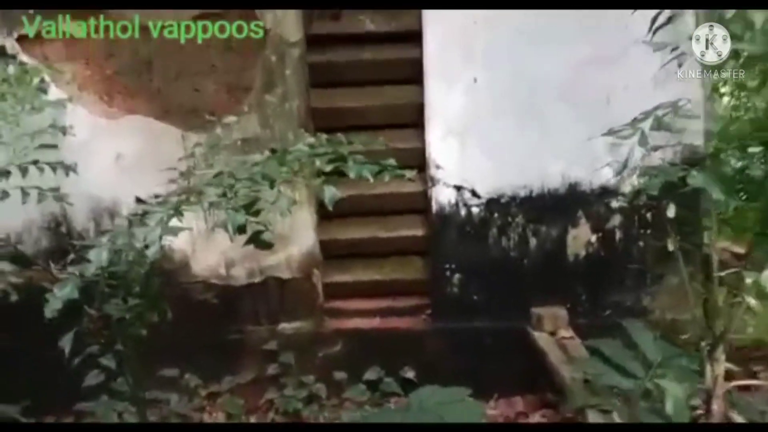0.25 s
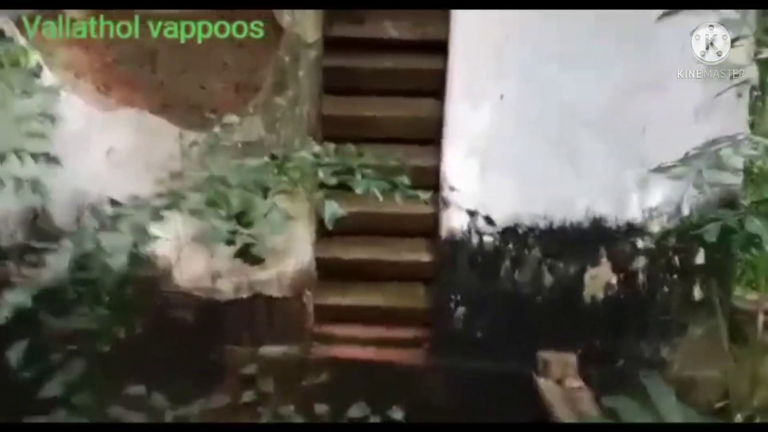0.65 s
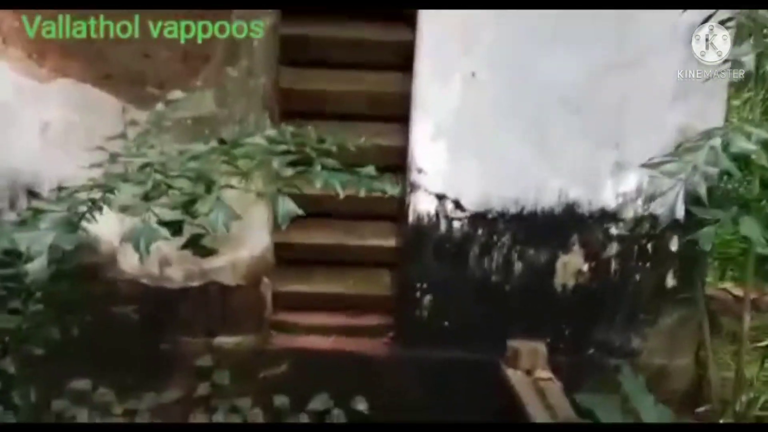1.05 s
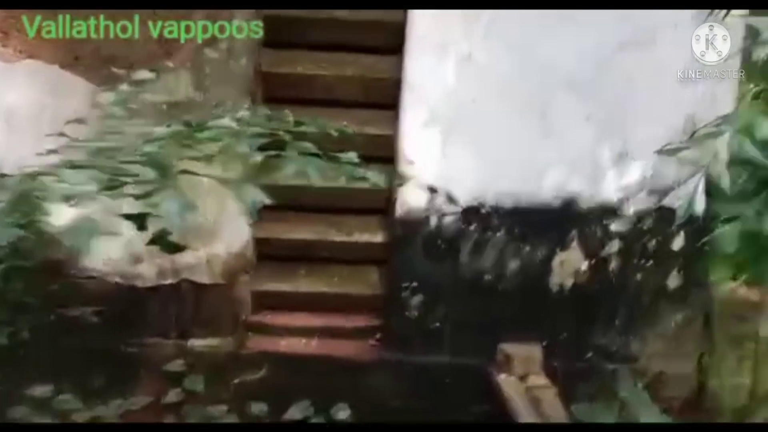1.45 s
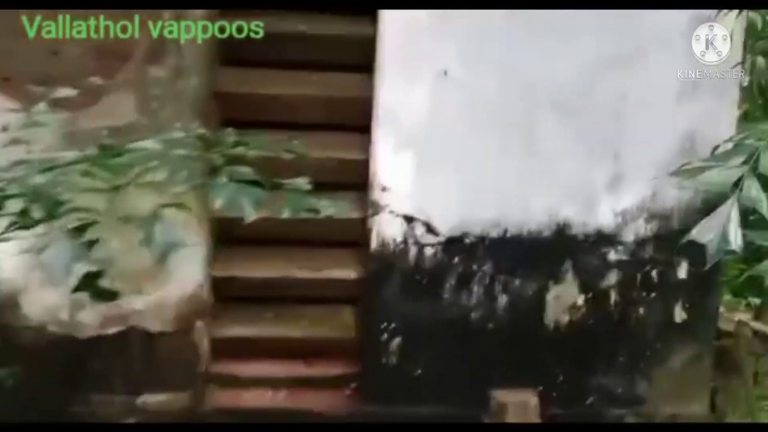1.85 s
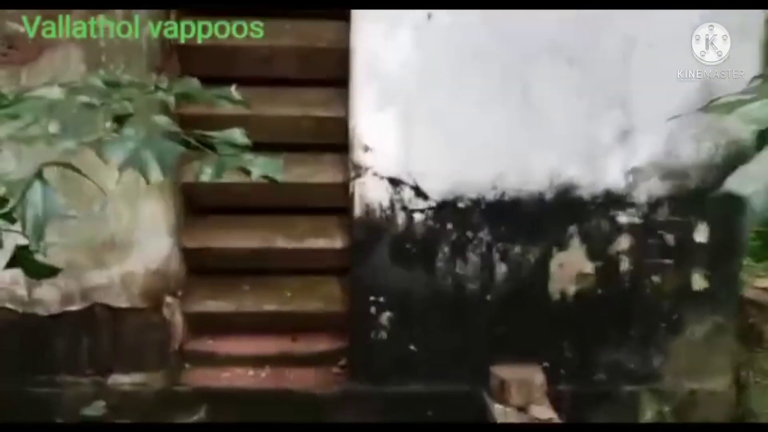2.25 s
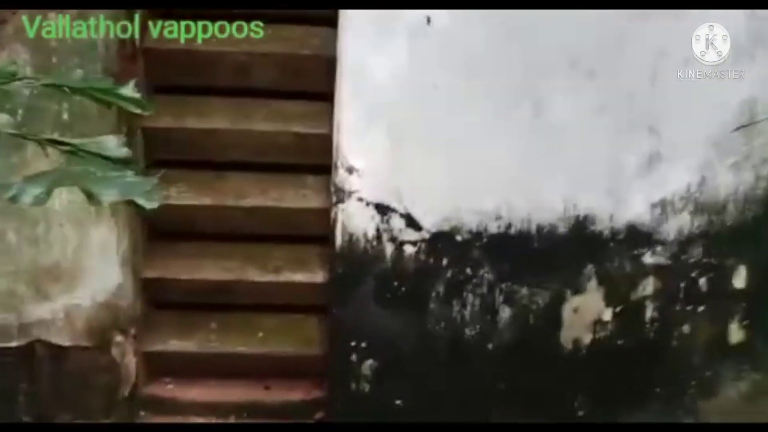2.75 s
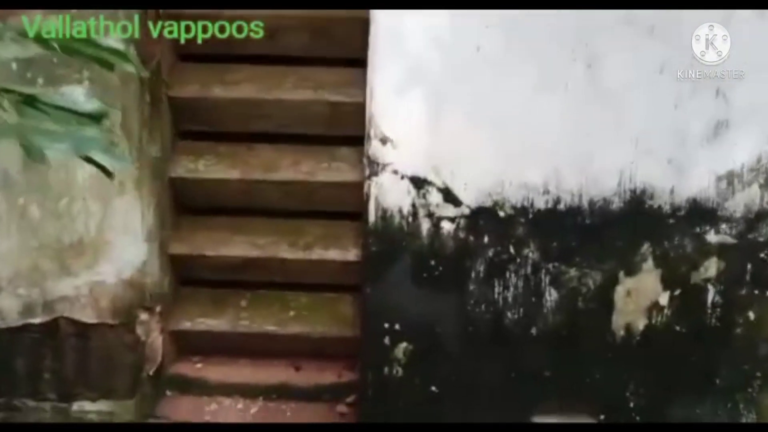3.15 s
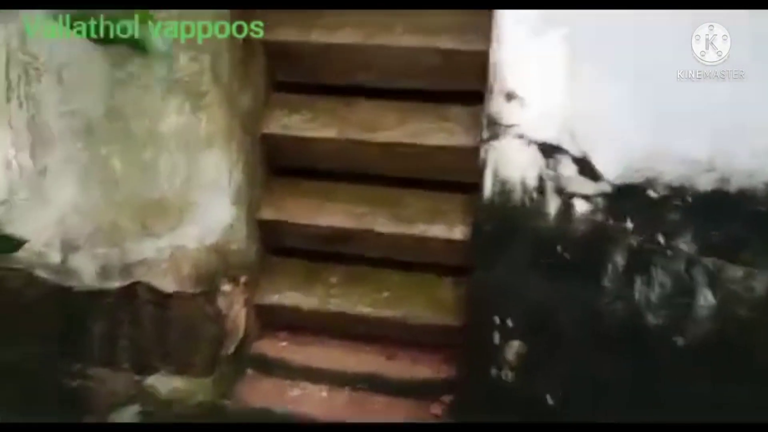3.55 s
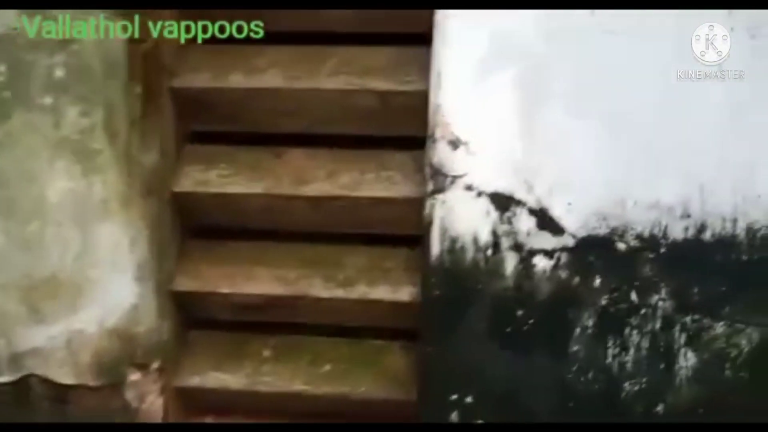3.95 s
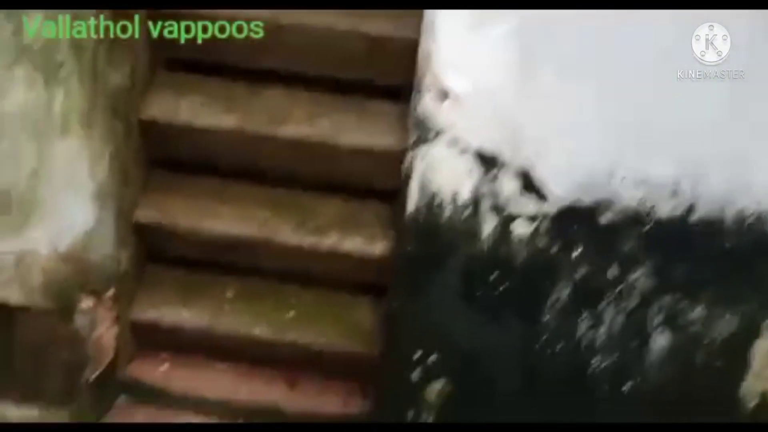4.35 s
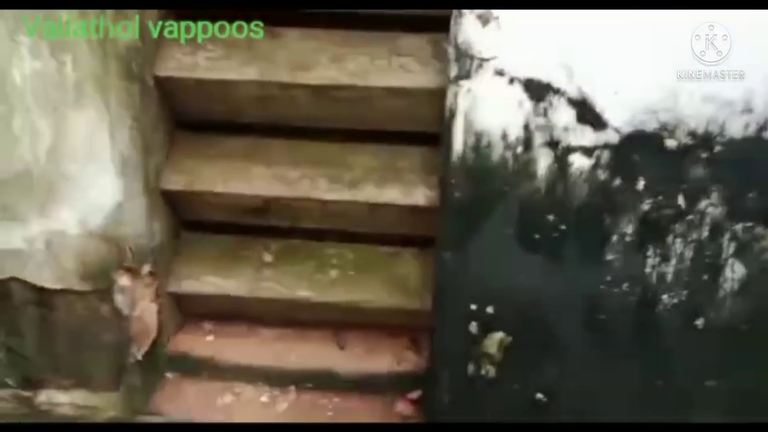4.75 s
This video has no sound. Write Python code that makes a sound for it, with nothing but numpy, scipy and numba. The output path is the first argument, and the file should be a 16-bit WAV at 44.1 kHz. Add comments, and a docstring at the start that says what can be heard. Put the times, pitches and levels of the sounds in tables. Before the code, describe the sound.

Close rustling through plants and leaf litter, swelling and fading, broken by crisp stem snaps, short twig cracks and a few hard crunches.

```python
"""Leaves swish and dry litter crunches as someone pushes through undergrowth beside an old wall, phone in hand.
Every move swells and fades noise full of tiny fractures, with a pocket of air ringing under the leaves.
Thin stems snap as bright noise bursts; thicker twigs give way in runs of short, pitched cracks.
Something hollow is rubbed close by, ringing in narrow noise bands, and soft bumps are low, damped swings.
Plants, ground, wall and stairs scatter these sounds over faint background noise with a raised treble band."""
import sys
import numpy as np
from scipy import signal
from scipy.fft import rfft, irfft
from scipy.io import wavfile
from scipy.ndimage import uniform_filter1d
from numba import njit

SR = 44100
rng = np.random.default_rng(int(sys.argv[2]) if len(sys.argv) > 2 else 0)


def dump(signal):
    """Clip the signal to [-1, 1] and save it as 16-bit WAV at the path in sys.argv[1]."""
    limited = np.clip(np.atleast_2d(signal).T, -1, 1)
    pcm = np.round(limited * 32767).astype(np.int16)
    wavfile.write(sys.argv[1], SR, pcm)


N = 220667
TIME = np.arange(N) / SR  # seconds

# All levels in the tables are relative mix levels.
# A leg or arm sweeping through the plants, with the pocket of air under the leaves:
# full_s, rise_s, hold_s, t60_s, leaf_db, litter_db, scuff_db, pocket_hz, pocket_q [no unit]
SWEEPS = [(0.0, .05, 0.0045, 0.54, -53.5, -53, -61, 1870, 3.3),
          (0.353, 0.32, 0.047, 0.33, -35.5, -39.5, -66.5, 1900, 2.8),
          (0.457, 0.4, 0.094, 0.45, -34.5, -36.5, -64, 970, 1.74),
          (0.696, 0.17, 0.061, 0.44, -49, -53, -73, 930, 4.7),
          (1.185, .3, .025, .3, -57.5, -65, -84, 1450, 4),
          (1.349, 0.56, 0.11, .3, -81, -52, -66.5, 1440, 15),
          (1.448, 0.28, 0.12, 0.34, -44.5, -46.5, -58, 1500, 4.9),
          (1.592, 0.093, 0.046, .3, -39.5, -36, -45.5, 1170, 1.4),
          (1.654, .06, 0.062, 0.55, -35.5, -36.5, -57, 1050, 3.2),
          (1.928, 0.6, 0.062, 0.34, -41, -37.5, -47, 880, 3.1),
          (2.046, 0.18, 0.021, 0.58, -44.5, -38.5, -39.5, 905, 1.7),
          (2.303, 0.19, 0.11, 0.81, -31, -32.5, -42.5, 850, .8),
          (2.536, 0.11, 0.12, 0.34, -32, -29, -65, 765, 2.4),
          (2.748, 0.12, 0.036, 0.29, -48, -42, -57.5, 1680, 7.5),
          (3.128, .16, 0.099, 0.37, -39.5, -55.5, -63.5, 1550, 1.1),
          (3.433, 0.078, 0.1, 0.26, -37, -37, -53, 1140, 4),
          (3.59, .05, 0.009, .7, -39, -41, -70.5, 1106, 12),
          (3.66, 0.13, 0.013, 0.73, -42, -50, -77, 1170, 14),
          (3.978, 0.066, .015, 0.23, -46, -43.5, -58, 1200, 0.27),
          (4.055, 0.22, 0.053, 0.52, -49, -46, -63, 2410, 0.89),
          (4.186, .15, .02, .5, -46, -54, -74.5, 1850, .45),
          (4.324, 0.036, 0.019, .15, -39.5, -56, -71, 1340, 1.7),
          (4.418, 0.19, 0.018, 0.23, -41.5, -47.5, -67, 916, 2.1),
          (4.914, 0.2, 0.077, .4, -43, -43, -69, 1390, 1.3)]
# Litter crushed in one go: peak_s, rise_s, t60_s, leaf_db, litter_db, scuff_db, pocket_hz
CRUNCHES = [(0.481, 0.047, 0.12, -29.5, -35, -59, 1000), (1.656, .014, 0.29, -47, -29.5, -32, 980),
            (2.6, 0.12, .15, -37, -21.5, -34.5, 790), (2.620, .055, 0.18, -31, -20.5, -35.5, 850),
            (2.646, .055, 0.13, -26.5, -28, -33, 920), (2.662, 0.0075, 0.043, -25.5, -19, -29.5, 1000),
            (3.467, .005, 0.3, -24.5, -31, -38.5, 1110), (3.537, 0.062, .1, -25.5, -22, -37, 1150),
            (3.551, 0.074, 0.051, -14.5, -13.5, -35, 1140), (3.561, .023, 0.066, -15.5, -19, -29, 1130),
            (3.992, .028, 0.088, -38, -43.5, -41, 696), (4.31, .004, .1, -42, -64, -78, 1600),
            (4.375, 0.011, 0.024, -62, -30.5, -69, 1340), (4.407, .083, 0.065, -32.5, -23, -44.5, 1370),
            (4.831, 0.0048, 0.1, -40.5, -64, -75.5, 1870), (4.898, 0.0068, 0.092, -21.5, -22, -64, 1120),
            (4.908, .021, 0.068, -23, -22.5, -65, 1610)]
# Soft bumps of foot and hand: start_s, level_db, pitch_hz, t60_s
BUMPS = [(0.013, -30, 337, 0.035), (0.015, -36, 198, 0.037), (1.612, -51, 87, 0.14),
         (1.692, -43, 125.5, 0.14), (2.630, -50.5, 110.7, 0.084), (3.466, -55, 128, 0.07),
         (3.492, -42.5, 181, 0.1), (3.555, -42, 204, 0.042), (3.989, -31.5, 620, 0.045),
         (4.012, -48, 136, 0.064), (4.013, -44.5, 316, 0.045), (4.405, -37.5, 240, 0.017),
         (4.43, -43.5, 61.4, 0.08)]
# Thin stems and dry leaves snapping: start_s, level_db, brightness_db (level of the added top)
SNAPS = [(0.2422, -34, -2), (0.4789, -24, -19), (0.7524, -42, -2), (0.771, -33.5, -5), (1.4926, -22, -1),
         (1.533, -24, 5.5), (1.5795, -19, 10.5), (1.6547, -13.5, 10.5), (1.965, -20.5, 0), (2.065, -29, 8),
         (2.5452, -16, -11), (2.6618, -16.5, -16), (3.392, -42, 8.5), (3.4267, -24, 1), (3.465, -1.5, 2.5),
         (3.475, -8.5, 5), (3.6645, -18, -5.5), (3.748, -19, -3.5), (4.3129, -21, -19.5),
         (4.5042, -33.5, -1), (4.831, -24.5, -5), (4.899, -10, -13)]
# Thicker twigs giving way: start_s, length_s (nominal, first to last crack), level_db, pitch_hz (first crack)
TWIGS = [(0.484, 0.0075, -17, 1500), (0.522, 0, -21, 1480), (0.765, 0.02, -36.5, 2880),
         (1.493, 0.0069, -30, 2890), (1.580, 0.0033, -21, 1960), (1.702, 0.0032, -22, 1300),
         (1.964, 0, -24, 3610), (2.251, 0.011, -29, 1220), (2.584, 0.035, -3, 1195), (2.661, 0, -14, 1660),
         (2.665, .008, -14, 3220), (3.538, 0.022, -4, 1255), (4.405, 0.0086, -14.5, 1720),
         (4.899, 0, -15, 2660), (4.915, 0.0064, -7, 1780)]
# Strokes of the hollow rub: full_s, rise_s, hold_s, t60_s, low_ring_db, high_ring_db
RUBS = [(1.872, .13, .085, 0.74, -27.5, -30.5), (2.064, 0.13, 0.032, 0.51, -48.5, -34.5)]
# Resonances of the hollow thing: pitch_hz, width_hz, level_db
RUB_MODES = [(405, 11, -16.5), (462.7, 20, -5), (582.6, 16, -1), (753, 30, -10.5), (963, 16, -11),
             (1315, 30, -15), (1375, 13, -1.5)]
# Tone colour of the leaf hiss: freq_hz, level_db
LEAF_COLOUR = [(1410, -28), (2400, -5.5), (2500, -18.5), (2700, -6.5), (3460, -6.5), (4680, -8), (5840, -2),
               (7770, -1.5), (9480, -10), (10500, -6.5), (12000, -7), (14400, -9), (14900, -4),
               (15600, -11), (16000, -19)]
# Tone colour of the crackling litter: freq_hz, level_db
LITTER_COLOUR = [(400, -27), (700, -14), (1050, -4), (1370, -1), (1800, 1), (2200, -5.5), (2750, -14),
                 (3350, -12.5), (3700, -14), (4400, -36)]
# Tone colour of the scuffing sole: freq_hz, level_db
SCUFF_COLOUR = [(60, -29), (130, 0.5), (230, -19), (330, -7.5), (450, -3.5), (600, -4), (780, -0.5),
                (1100, -26)]
# Tone colour in the body of a snap: freq_hz, level_db
SNAP_COLOUR = [(700, -28.5), (1500, -8.5), (2600, -12.5), (3400, -15), (4500, -10), (6200, 2.5), (7500, 0),
               (9700, -14), (16000, -33.5)]
# Tone colour of the added top of a snap: freq_hz, level_db
SNAP_TOP_COLOUR = [(4000, -34), (8000, -21.5), (10500, -5), (12000, 0), (14000, -0.5), (16000, -1.5)]
# Tone colour of the background noise, with a raised band near 8-10 kHz: freq_hz, level_db
BACKGROUND_COLOUR = [(25, -20.5), (64, -5), (130, 0), (242, -9), (500, -12), (880, -14.5), (1400, -4),
                     (2600, -17), (3250, -17.5), (4100, -30.5), (7200, -21.5), (7950, -7), (10400, -15.5),
                     (11200, -28), (16000, -27)]
# Narrow resonances of the phone's case and microphone port: freq_hz, width_hz, added_db
CASE_MODES = [(1347, 43, -3), (3370, 270, -7.5), (5470, 82, -3.5), (5990, 33, -1), (6720, 30, -10.5),
              (7970, 51, -4), (11940, 55, -4.5)]

POCKET_SINK_OCT, POCKET_SINK_S = 0.12, 0.03  # the ring sinks from this far above its pitch to as far below
SCUFF_POWER = 1.1  # the sole scuffs only under load, so it swells later and fades sooner than the leaves
CRUNCH_Q = 1.2  # crushed litter damps the pocket
CRACK_GAP_S, MIDDLE_CRACK_DB = .008, -3  # rough spacing; weaker between the first crack and the last
CRACK_SPREAD_OCT, CRACK_JITTER_S = 0.17, .001
BACKGROUND_DB = -62.5  # average level before the recorder
TOP_HZ = 15800


def undb(db):
    """Decibels to gain."""
    return 10 ** (np.asarray(db) / 20)


def unit(x):
    """Scale to rms 1."""
    return x / np.sqrt(np.mean(x ** 2))


def fade(t, t60):
    """Exponential decay, 60 dB in t60, levelling out at -180 dB."""
    return np.exp(-np.log(1000) * np.minimum(t / max(t60, 1e-3), 3))


def swell(s, rise, hold, t60):
    """Climb 60 dB in the rise time, hold from time s, then die away."""
    climb = fade(np.maximum(s - TIME, 0), rise)
    return climb * fade(np.maximum(TIME - s - hold, 0), t60)


def add(out, s, sound):
    """Mix a sound in at time s."""
    i = max(int(s * SR), 0)
    out[i:i + len(sound)] += sound[:N - i]


def colour(x, points, size=2048):
    """Minimum-phase filter of unit energy, shaped through freq_hz, level_db points."""
    hz, db = np.transpose(points)
    bins = np.maximum(np.arange(size // 2 + 1) * SR / size, 1)
    gain = undb(np.interp(np.log(bins), np.log(hz), db))
    # folding the cepstrum forward makes the filter respond only after its input
    cepstrum = irfft(np.log(gain))
    cepstrum[1:size // 2] *= 2
    cepstrum[size // 2 + 1:] = 0
    response = irfft(np.exp(rfft(cepstrum)))
    return signal.fftconvolve(x, response / np.linalg.norm(response))[:len(x)]


def band(x, lo_hz, hi_hz, order=2):
    """Band-pass between two edges."""
    edges = [lo_hz, min(hi_hz, SR / 2 - 1)]
    return signal.sosfilt(signal.butter(order, edges, "band", fs=SR, output="sos"), x)


def walk(rate):
    """Smooth random drift of rms 1, drawing a new value rate times a second."""
    k = max(int(SR / rate), 1)
    steps = np.repeat(rng.standard_normal(N // k + 1), k)[:N]
    return unit(uniform_filter1d(steps, k))


def steady(x, span_s):
    """Keep the fine grain of a texture but hold its power near 1 over a span."""
    power = uniform_filter1d(x ** 2, max(int(span_s * SR), 2))
    return x / np.sqrt(power + 1e-9)


def crackle(rate, spread_db, smooth):
    """Tiny fractures of uneven size, rate per second on average, over the smooth noise of sliding."""
    happens = rng.random(N) < rate / SR
    sign = rng.choice([-1, 1], N)
    size = undb(spread_db * np.minimum(rng.exponential(size=N), 5))
    return unit(happens * sign * size) + smooth * rng.standard_normal(N)


@njit
def resonant_highpass(x, hz, q):
    """State-variable high-pass whose edge and sharpness move."""
    y, b, l = np.empty(len(x)), 0., 0.
    for i in range(len(x)):
        g, k = np.tan(np.pi * hz[i] / SR), 1 / q[i]
        v = (b + g * (x[i] - l)) / (1 + g * (g + k))
        low = l + g * v
        b, l, y[i] = 2 * v - b, 2 * low - l, x[i] - k * v - low
    return y


def leaf_rings(count=700, spread_db=2.5, ring_t60=0.043, lowest_hz=1700):
    """Single stiff leaves flick and ring briefly, each at its own pitch; small, high ones stop sooner."""
    out, t = np.zeros(N), TIME[:SR // 20]
    for when, pitch, size in rng.random((count, 3)):
        hz = lowest_hz * 4 ** pitch  # over two octaves
        decay = fade(t, ring_t60 * np.sqrt(lowest_hz / hz))
        gain = undb(spread_db * min(-np.log(1 - size), 4))
        add(out, when * TIME[-1], gain * np.sin(2 * np.pi * hz * t) * decay)
    return unit(out)


def moves():
    """Levels of leaf, litter and scuff; the pocket's pitch and sharpness lean to the loudest litter."""
    crunches = [(s, rise, 0, *rest, CRUNCH_Q) for s, rise, *rest in CRUNCHES]
    power, pocket, total = np.zeros((3, N)), np.zeros((2, N)), np.zeros(N)
    for s, rise, hold, t60, leaf_db, litter_db, scuff_db, hz, q in SWEEPS + crunches:
        load = swell(s, rise, hold, t60)
        litter = undb(litter_db) * load
        power[0] += (undb(leaf_db) * load) ** 2
        power[1] += litter ** 2
        power[2] += (undb(scuff_db) * load ** SCUFF_POWER) ** 2
        weight = litter ** 4
        sink = POCKET_SINK_OCT * np.tanh((TIME - s) / POCKET_SINK_S)
        pocket[0] += weight * (np.log2(hz) - sink)
        pocket[1] += weight * np.log2(max(q, .1))
        total += weight
    return (*np.sqrt(power), *2 ** (pocket / total))


def rustle(flick_db=-7, flutter_db=1.5, low_hz=385, low_follow=0.29, leaf_trim_db=-1.0):
    """Leaves hiss, litter crackles and soles scuff; each sweep or crunch swells all three and dies away."""
    leaf, litter, scuff, hz, q = moves()
    sliding = crackle(rate=2600, spread_db=1.0, smooth=.55)
    hiss = colour(sliding + undb(flick_db) * leaf_rings(), LEAF_COLOUR)

    grit = colour(crackle(rate=700, spread_db=1.0, smooth=0.87), LITTER_COLOUR)
    grit = resonant_highpass(grit, hz, q)
    grit = resonant_highpass(grit, 0.5 * hz, np.ones(N))  # little radiates below the pocket's resonance

    drag = colour(crackle(rate=540, spread_db=0.0, smooth=0.5), SCUFF_COLOUR)
    drag = band(drag, 45, 1300)
    # the pocket's lower resonance moves along, at low_hz when the pocket is at 1 kHz
    drag = resonant_highpass(drag, low_hz * (hz / 1000) ** low_follow, q)

    catch = undb(flutter_db * walk(90))  # leaves catch and slip, so all the layers flutter together
    mix = undb(leaf_trim_db) * leaf * steady(hiss, 0.019)
    mix += litter * steady(grit, 0.026)
    mix += scuff * steady(drag, 0.044)
    return catch * mix


def background():
    """Faint background noise, nearly steady in level, with a raised band near 8-10 kHz."""
    noise = unit(colour(rng.standard_normal(N), BACKGROUND_COLOUR))
    return undb(BACKGROUND_DB + .7 * walk(1.1)) * noise


def bumps(contact_s=0.0019):
    """Soft contact builds up gradually and leaves a low, damped swing."""
    out, t = np.zeros(N), TIME[:SR // 4]
    for s, db, hz, t60 in BUMPS:
        swing = np.sin(2 * np.pi * hz * t) * fade(t, t60)
        add(out, s, 2 * undb(db) * swing * (1 - np.exp(-t / contact_s)))
    return out


def snaps(crack_t60=0.0067, splinter=0.24, splinter_t60=0.076, level_db=-7):
    """A sharp crack of noise with a weaker, longer tail of splintering fibres; each snap has its own top."""
    out, t = np.zeros(N), TIME[:SR // 10]
    for s, db, bright_db in SNAPS:
        decay = fade(t, crack_t60) + splinter * fade(t, splinter_t60)
        burst = rng.choice([-1, 1], len(t)) * decay
        snap = colour(burst, SNAP_COLOUR) + undb(bright_db) * colour(burst, SNAP_TOP_COLOUR)
        add(out, s, undb(db + level_db) * snap)
    return out


def twigs(ring_t60=0.0093, splinter=0.18, splinter_t60=0.0044):
    """Fibres break one after another; each crack rings the damp wood briefly, with a short tearing noise."""
    out, t = np.zeros(N), TIME[:SR // 20]
    for s, length, db, pitch_hz in TWIGS:
        chance = rng.standard_normal((20, 2))
        noise = rng.standard_normal((20, len(t)))
        last = int(np.clip(round(length / CRACK_GAP_S), 0, 10))
        for k, (detune, late) in enumerate(chance[:last + 1]):
            middle = 0 < k < last
            hz = pitch_hz * 2 ** (CRACK_SPREAD_OCT * detune * (k > 0))  # the first crack keeps its pitch
            ring = np.sin(2 * np.pi * hz * t) * fade(t, ring_t60)
            tear = splinter * band(noise[k], 1500, 6500) * fade(t, splinter_t60)
            when = s + length * k / max(last, 1) + middle * CRACK_JITTER_S * late
            crack = band(ring + tear, .5 * hz, 17000, order=5)
            add(out, when, undb(db + middle * MIDDLE_CRACK_DB) * crack)
    return out


def rub(level_db=-2.5, waver_s=0.00011):
    """Stick-slip friction keeps the resonances of something hollow ringing; their pitch wavers slightly at random."""
    slips = crackle(rate=730, spread_db=0, smooth=0.34)
    low, high = np.zeros((2, N))
    for *shape, low_db, high_db in RUBS:
        stroke = swell(*shape)
        low += undb(low_db) * stroke
        high += undb(high_db) * stroke
    out = np.zeros(N)
    for hz, width, db in RUB_MODES:
        ring = steady(band(slips, hz - width / 2, hz + width / 2, order=1), 0.046)
        out += undb(db) * ring * (low if hz < 1100 else high)
    out = np.interp(TIME + waver_s * walk(35), TIME, out)  # small time shifts bend the pitch
    return undb(level_db) * band(out, 340, 2000, order=4)


def surroundings(x, near_db=-9, near_t60=0.052, far_db=-21, far_t60=0.16):
    """Ground and plants scatter the sound almost at once; wall and stairs return a duller tail."""
    t = TIME[:SR // 2]
    near = rng.standard_normal(len(t)) * fade(t, near_t60) * (t > .003)
    far = band(rng.standard_normal(len(t)), 400, 5100, order=1) * fade(t, far_t60) * (t > .018)
    response = undb(near_db) * near / np.linalg.norm(near)
    response += undb(far_db) * far / np.linalg.norm(far)
    return x + signal.fftconvolve(x, response)[:N]


def scene():
    """All sources at one microphone, over the background noise."""
    close = rustle() + bumps() + snaps() + twigs() + rub()
    return (surroundings(close) + background())[None]


def record(dry, low_cut_hz=55):
    """The phone's case colours the sound; the recorder drops deep bass, clips at full scale and cuts the top."""
    x = dry.copy()
    for hz, width, db in CASE_MODES:
        x += undb(db) * band(dry, hz - width / 2, hz + width / 2, order=1)
    x = signal.sosfilt(signal.butter(2, low_cut_hz, "high", fs=SR, output="sos"), x)
    top_cut = signal.ellip(10, .2, 70, TOP_HZ, fs=SR, output="sos")
    return signal.sosfilt(top_cut, np.clip(x, -1, 1))


dry = scene()
out = record(dry)
dump(out)
```